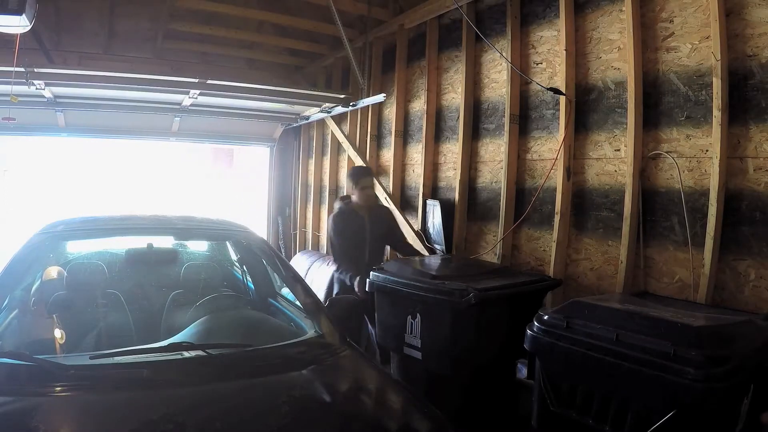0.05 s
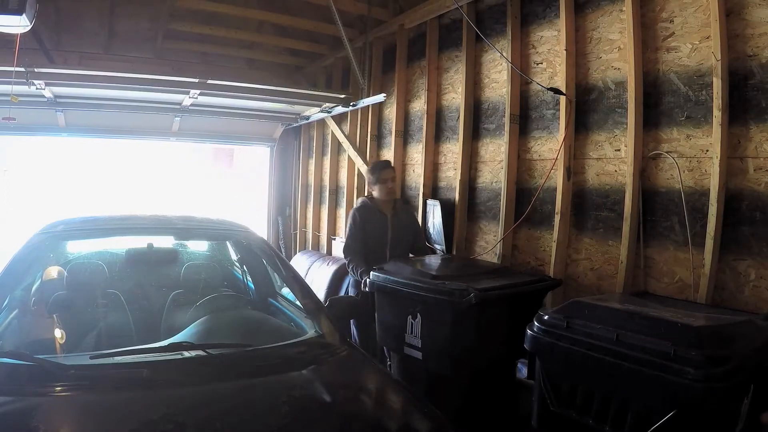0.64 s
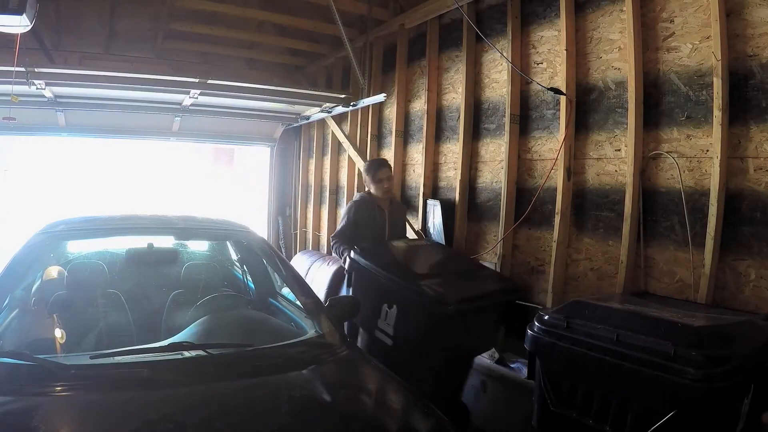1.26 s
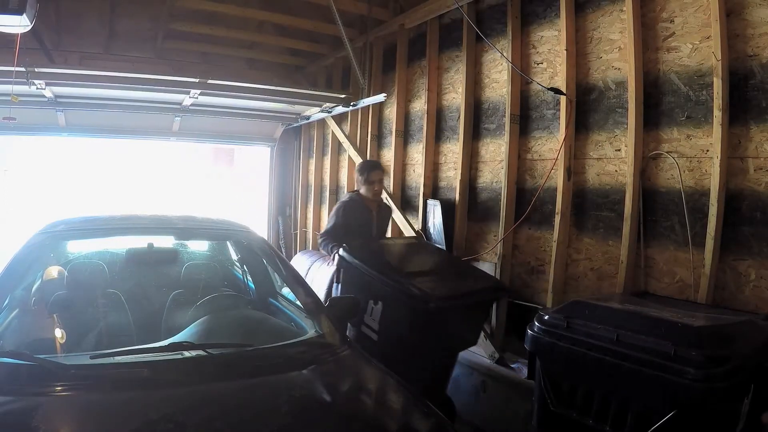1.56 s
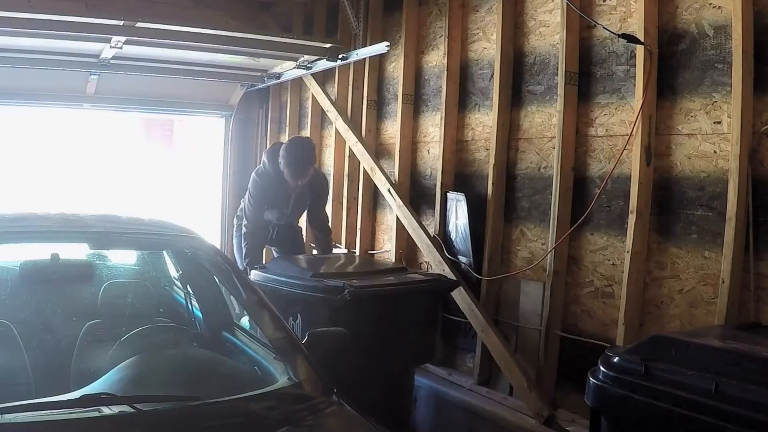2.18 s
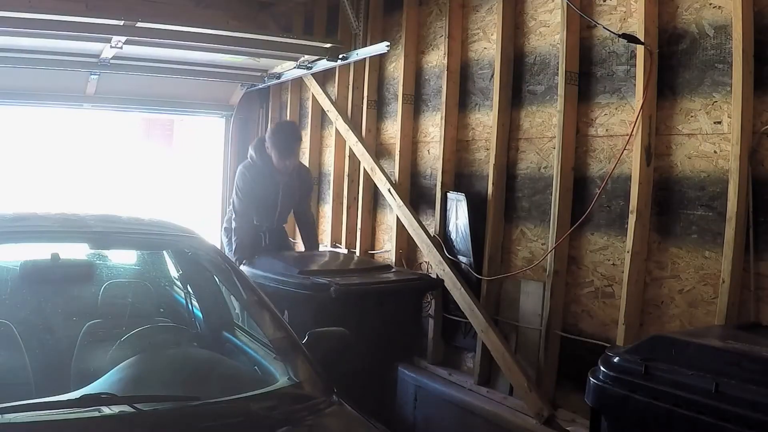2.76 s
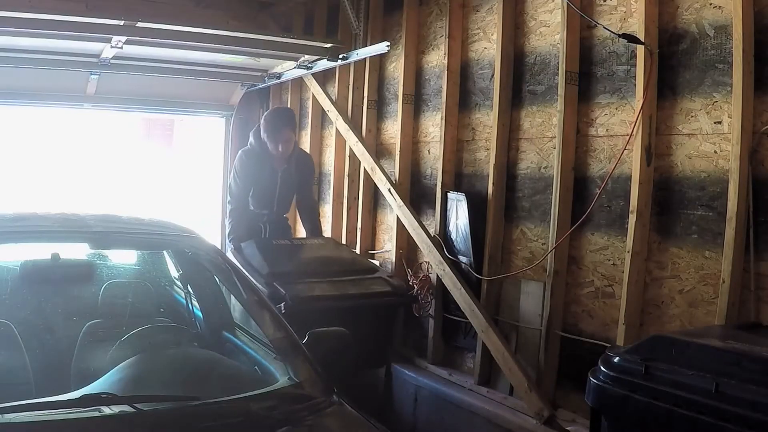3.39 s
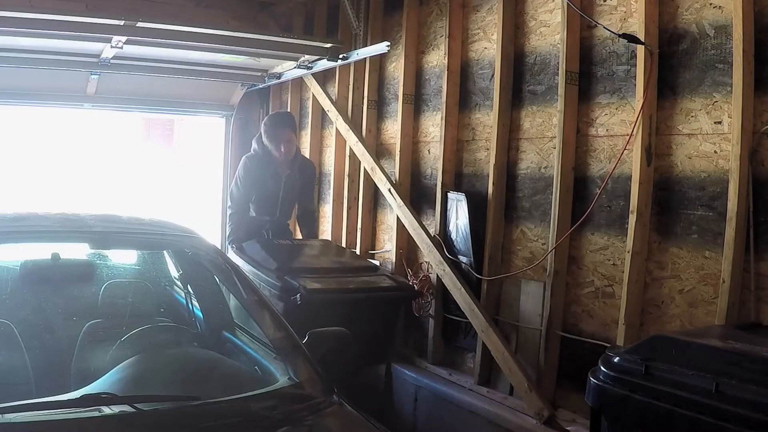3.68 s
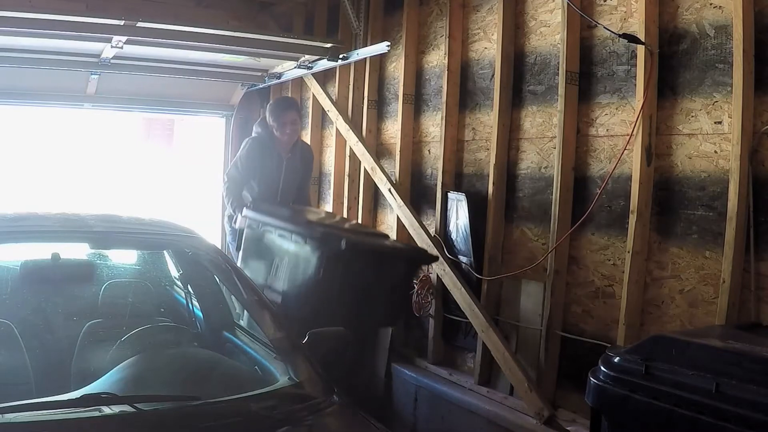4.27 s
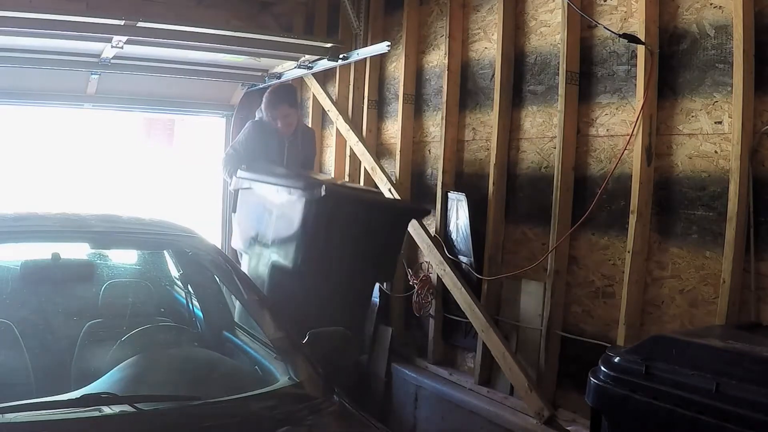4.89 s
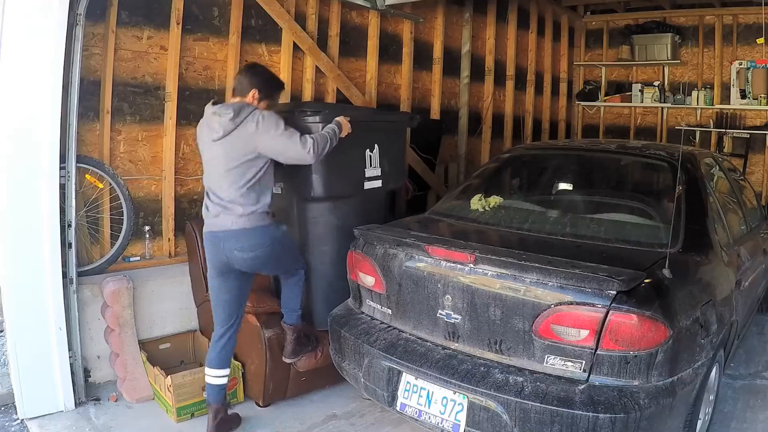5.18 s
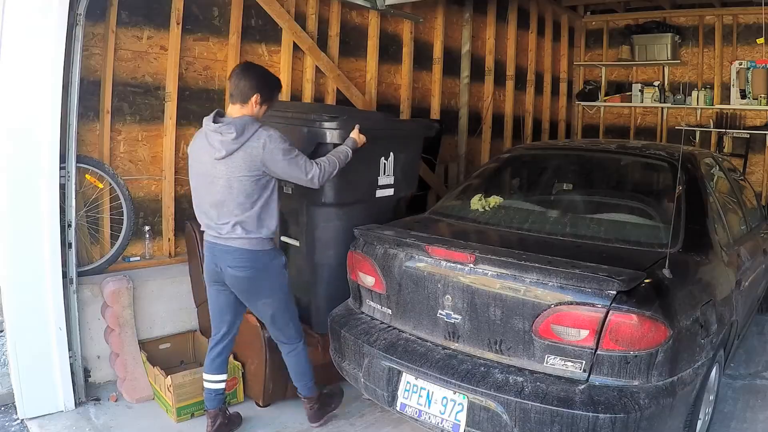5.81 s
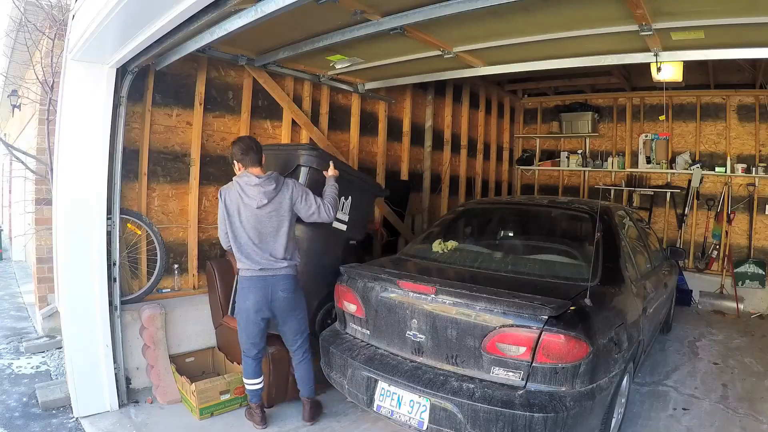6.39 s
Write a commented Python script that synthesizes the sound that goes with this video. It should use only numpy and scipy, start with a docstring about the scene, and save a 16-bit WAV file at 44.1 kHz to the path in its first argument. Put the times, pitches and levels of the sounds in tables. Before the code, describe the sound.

Hollow plastic bumps, low booms and gritty scrapes as a big wheeled bin is tipped and shoved along in a garage.

```python
"""A large plastic wheeled bin, grabbed, tipped, dragged and lifted along a timber-framed garage wall.
From inside, the microphone hears the hollow shell knock, the broad walls boom, and wheels and rim
scrape over gritty concrete; one hard clack rings out. For the last stretch the microphone is at the
open door: a few light taps sound and the bin slides on. The garage answers with a short
echo, and a faint hush and rumble come in from outdoors."""
import sys
import numpy as np
from scipy import signal
from scipy.fft import rfft, irfft
from scipy.io import wavfile
from scipy.ndimage import uniform_filter1d

SR = 44100
rng = np.random.default_rng(int(sys.argv[2]) if len(sys.argv) > 2 else 0)


def waveform_to_disk(signal):
    """Save audio, clipped to [-1, 1], as 16-bit WAV at the path in sys.argv[1]."""
    frames = np.transpose(np.atleast_2d(signal))
    scaled = np.clip(frames, -1, 1) * 32767
    samples = np.round(scaled).astype(np.int16)
    wavfile.write(sys.argv[1], SR, samples)


N = 284445
TIME = np.arange(N) / SR
DOORWAY_S = 4.96  # the microphone is at the open door from here on
USUAL_STROKE_DB = -40  # shell and shudder grow with a stroke's drive above this

# pushes and pulls of the bin: start_s, swell_s, fade_s, drive_db, grit_db (relative to the drive)
BIN_STROKES = [ (0.086, 0.0097, 0.16, -46, -10), (0.125, 0.03, 0.14, -41, -6.5),
               (0.365, 0.03, 0.097, -49.5, -6.5), (0.553, 0.011, 0.57, -53, -1), (0.64, 0.15, .1, -49.5, 1),
               (0.77, .025, 0.15, -29, -3), (0.82, 0.039, 0.68, -37, -5), (1.019, 0.017, 0.18, -31.5, -19),
               (1.119, 0.048, 0.32, -34.5, 0.5), (1.483, 0.032, 0.085, -47, 7),
               (1.625, 0.0036, 0.15, -50, 1.5), (1.925, .035, 0.074, -53, -22),
               (2.085, 0.048, .13, -47.5, -2.5), (2.225, 0.083, 0.13, -41, -3),
               (2.361, .008, 0.2, -42, -1.5), (2.54, 0.0061, 0.094, -43.5, -11),
               (2.72, 0.029, 0.35, -60.5, 2.5), (2.85, .03, 0.091, -40, -6.5),
               (2.918, 0.086, 0.12, -25.5, -11), (3.21, 0.012, 0.14, -29, -12.5),
               (3.38, 0.14, 0.062, -52.5, 0), (3.812, 0.024, 0.28, -46.5, -2),
               (3.95, 0.081, 0.3, -56, -1.5), (4.12, 0.14, 0.61, -59.5, -0.5),
               (4.898, 0.049, 0.14, -55.5, 1), (5.235, 0.071, 0.1, -48, 0.5), (5.431, .004, .1, -44.5, -28),
               (5.473, 0.025, 0.2, -39, -0.5), (5.58, 0.057, 0.25, -44, -30),
               (5.839, 0.0077, 0.26, -47.5, -8), (5.955, 0.033, 0.26, -44.5, -2),
               (5.99, 0.18, .16, -40, -1.5), (6.18, 0.076, 0.23, -43.5, 1)]
# blows on the hollow shell: start_s, force_db, pitch_hz (favoured by the spot struck)
SHELL_KNOCKS = [ (0.135, -35, 490), (0.164, -38.5, 180), (0.672, -35.5, 420), (0.81, -23.5, 473),
                (0.867, -24, 292), (0.968, -26, 300), (1.041, -19.5, 595), (1.062, -25, 358),
                (1.185, -29.5, 257), (1.345, -36, 298), (2.124, -35, 265), (2.176, -44, 260),
                (2.325, -40.5, 242), (2.575, -44, 315), (2.73, -43.5, 480), (2.866, -30.5, 434),
                (2.922, -29.5, 590), (2.963, -22, 203), (3.029, -26.5, 654), (3.227, -20, 483),
                (3.25, -25.5, 253), (3.835, -39, 172), (5.26, -41.5, 205), (5.431, -42, 550),
                (5.531, -32, 630), (5.649, -30.5, 154), (5.698, -30.5, 430), (5.855, -41, 700)]
# flexing wall panels: start_s, level_db, pitch_hz, t60_s
WALL_BOOMS = [ (0.159, -24.5, 67.4, 0.19), (0.708, -24, 52.4, 0.96), (0.786, -17.5, 96, 0.51),
              (0.88, -10.5, 45.6, .3), (0.957, -5, 44.6, 0.6), (1.038, -3, 59.9, 0.18),
              (1.131, -8, 66.6, 0.27), (1.322, -9.5, 43.7, 0.29), (2.261, -11.5, 58.7, .17),
              (2.818, -25.5, 58.5, 0.5), (2.959, -8, 111.7, 0.13), (2.993, -21, 69, 0.16),
              (3.232, -8, 47, 0.12), (3.831, -21.5, 71.7, 0.16), (5.472, -8, 67.7, 0.044),
              (5.644, -14, 70.2, 0.21), (5.713, -19, 97.6, .31), (6.226, -28.5, 75.7, 0.16)]
# ticks of wheels, lid and grit: start_s, level_db, lowest_hz, ping_db (relative to the level)
HARD_TICKS = [ (0.09, -65, 650, -18), (0.555, -59.5, 1500, -14), (0.781, -36, 2000, -15),
              (1.051, -43.5, 3500, -7), (1.102, -39, 3950, -0.5), (1.351, -47, 3160, -11),
              (1.514, -52, 1780, -14), (1.628, -49, 1500, -22), (2.118, -52, 3630, -7),
              (2.303, -43.5, 5200, -5), (2.363, -38.5, 1840, -12), (2.547, -50, 2540, -12),
              (2.86, -56, 3500, -8), (3.207, -39, 2370, -9.5), (3.432, -51, 4000, -10),
              (3.826, -59, 3970, -11), (5.48, -51, 3500, -14), (6.145, -47.5, 1800, -18)]
# hard parts meeting and rebounding: start_s, level_db
HARD_CLACKS = [(1.101, -45.5), (1.2218, -21), (1.234, -31)]
# light taps: start_s, level_db, brightness_hz, decay_s
LIGHT_TAPS = [(5.1072, -51, 3300, 0.0022), (5.156, -52, 2810, 0.003), (5.208, -43, 900, 0.0053)]

# ringing modes: pitch_hz, relative_db, t60_s
SHELL_RING = [(143, 0, 0.17), (173.9, -0.5, 0.51), (220.3, -7, 0.17), (296.4, 1, 0.42), (345, -9.5, 0.41),
              (359, -15, 0.23), (412.4, -3.5, 0.29), (480, -1.5, 0.43), (676, -15.5, 0.4),
              (723, -1.5, 0.16), (978, -19, .5), (1183, -8, .5)]  # the hollow shell
CLACK_RING = [(2906, -6, .35), (3278, -1, .48), (3365, -2, .45), (3417, -3, .4), (3941, -5, .42),
              (4250, 1, .4), (4863, -1, .36), (2196, -6, .28), (2369, -9, .4), (4084, -2, .33),
              (4127, -1, .33), (4176, -2, .33), (5128, -3, .35), (5340, -5, .3), (5658, -1, .3),
              (5927, -2, .2), (7569, -8, .25)]  # the hard parts
TICK_RING = [(4670, -6, 0.12), (4970, -3, 0.12), (5340, -3.5, .12), (6650, -4, .08), (8000, -9, 0.063)]  # lid and wheels

# spectra: frequency_hz, relative_db
SHELL_INSIDE_SPECTRUM = [(40, -52), (100, 6), (170, -6.5), (240, -3.5), (330, -0.5), (480, -3),
                         (800, -11.5), (1500, -14.5), (4000, -61.5)]  # the shell's thud from inside the garage
SHELL_DOORWAY_SPECTRUM = [(40, -19), (100, -10), (150, 5), (220, 1), (300, 0), (420, -1), (600, -9),
                          (850, -7.5), (1500, -30), (2700, -17.5), (5000, -56)]  # the same thud from the door
RASP_SPECTRUM = [(200, -29.5), (500, 4), (900, 3.5), (1400, 0.5), (2400, -9.5), (4000, -19.5),
                 (9000, -54.5)]  # plastic rubbing on concrete
GRIT_SPECTRUM = [(800, -13.5), (2000, 7.5), (3300, 6), (5500, 0.5), (8000, -5), (11000, -11.5),
                 (15000, -18.5)]  # grit crushed under the bin
CLACK_SPECTRUM = [(700, -26), (1700, -12.5), (2300, -1.5), (3000, 0), (4100, 4), (5500, -1), (8000, -6),
                  (11000, -12.5), (15000, -27.5)]  # the crack of hard parts
TICK_SPECTRUM = [(600, -22.5), (2000, 14.5), (3300, 8), (5500, 4), (8000, 1.5), (11000, -6.5), (15000, -16)]  # small hard contacts
RUMBLE_SPECTRUM = [(12, -21.5), (24, 7), (33, -6), (48, 1), (65, -2), (100, -7.5), (150, -19), (300, -68.5)]  # the bin's shudder and the outdoor rumble
HUSH_SPECTRUM = [(35, -22.5), (60, -12), (150, -17), (219, -16.5), (295, -15), (438, -22.5), (780, -20.5),
                 (1450, -24), (2110, -30.5), (3340, -29.5), (7680, -39), (15000, -47.5)]  # open air

# decay of the garage echo: frequency_hz, t60_s
ECHO_DECAY = [(80, 0.97), (300, 0.81), (1000, 0.7), (3000, 0.49), (7000, 0.42), (14000, 0.27)]
# outdoor hush, rising again at the open door: time_s, level_db
HUSH_LEVEL = [(0, -55), (0.5, -57.5), (1.6, -57.5), (2.0, -59.5), (2.5, -59.5), (3.7, -59.5), (4.2, -57),
              (4.9, -57.5), (5.1, -55.5), (6.45, -55.5)]


def bin_strokes():
    """Each push or pull swells and fades: the drive in dB of the rubbing and of the grit under it."""
    rub, grit = np.zeros((2, N)) + 1e-12
    for start_s, swell_s, fade_s, drive_db, grit_db in BIN_STROKES:
        power = np.interp(TIME[:2 * SR], [0, swell_s, swell_s + fade_s], [0, 1, 0]) ** 2.1
        add(rub, start_s, power * amp(drive_db) ** 2)
        add(grit, start_s, power * amp(drive_db + grit_db) ** 2)
    return 10 * np.log10(rub), 10 * np.log10(grit)


def bin_scrape(rub_db, grit_db):
    """Dragging rasps the plastic and crushes grit; the harder the bin presses, the more its shell joins."""
    shell_drive = amp(-37 + 1.11 * (rub_db - USUAL_STROKE_DB))
    shaking = stick_slip(per_s=900, scatter_db=2.4, judder_db=1.5, judder_hz=45)
    body = bin_shell(shell_drive * shaking, direct_db=2, ring_db=-12.5)
    rubbing = stick_slip(per_s=1500, scatter_db=1.66, judder_db=1.93, judder_hz=60)
    rasp = amp(rub_db + 0.46) * through(rubbing, response(RASP_SPECTRUM))
    crushing = stick_slip(per_s=6000, scatter_db=1.5, judder_db=2.6, judder_hz=70)
    crunch = amp(grit_db - 2.0) * through(crushing, response(GRIT_SPECTRUM))
    return body + garage(rasp + crunch, direct_db=4)


def bin_knocks(spot_q=1.4, cutoff_ratio=1.5, coupling_db=-15.5):
    """Each spot struck drives the shell near its own pitch; the yielding plastic mutes what lies above."""
    force = np.zeros(N)
    for start_s, force_db, pitch_hz in SHELL_KNOCKS:
        contact = chatter(decay_s=0.006, bite=0.48)
        push = signal.lfilter(*signal.iirpeak(pitch_hz, spot_q, SR), contact)
        add(force, start_s, blow(cut(push, cutoff_ratio * pitch_hz, "low"), force_db))
    return bin_shell(force, direct_db=-1.5, ring_db=-4.5) * amp(coupling_db)


def bin_shell(force, direct_db, ring_db):
    """The hollow shell gives a broad thud, plus a few lasting modes that do not carry to the door."""
    at_door = TIME >= DOORWAY_S
    thud = through(force * ~at_door, response(SHELL_INSIDE_SPECTRUM))
    thud += through(force * at_door, response(SHELL_DOORWAY_SPECTRUM))
    return garage(thud, direct_db) + amp(ring_db) * through(force * ~at_door, ring(SHELL_RING))


def bin_booms(push_s=0.006, overtone_ratio=3.1, overtone_db=-20.5):
    """A wall panel is pushed in over a few milliseconds and swings back slowly, with a weaker overtone."""
    out, t = np.zeros(N), TIME[:SR]
    for start_s, level_db, pitch_hz, t60_s in WALL_BOOMS:
        swing = (1 - np.exp(-(t / push_s) ** 2)) * amp(-60 * t / t60_s)
        phase = 2 * np.pi * pitch_hz * t
        tone = np.sin(phase) + amp(overtone_db) * np.sin(overtone_ratio * phase)
        add(out, start_s, amp(level_db) * swing * tone)
    return out


def bin_clack(ring_db=-4.5):
    """Hard parts meet in a sharp crack and rebound, and a cluster of bright modes rings on."""
    cracks, ringing = np.zeros((2, N))
    for start_s, level_db in HARD_CLACKS:
        crack = through(chatter(decay_s=0.0028, bite=0.18), response(CLACK_SPECTRUM))
        add(cracks, start_s, blow(crack, level_db))
        add(ringing, start_s, blow(ring(CLACK_RING), level_db + ring_db))
    return garage(cracks, direct_db=1) + ringing


def bin_ticks():
    """Small bright contacts of wheels, lid and grit, each with a brief plastic ping."""
    out, colour = np.zeros(N), response(TICK_SPECTRUM)
    for start_s, level_db, lowest_hz, ping_db in HARD_TICKS:
        contact = cut(chatter(decay_s=0.0075, bite=0.39), lowest_hz, "high")
        add(out, start_s, blow(through(contact, colour), level_db))
        add(out, start_s, blow(ring(TICK_RING), level_db + ping_db))
    return out


def light_taps():
    """Brief, light contacts, each a band of chatter with no ringing modes."""
    out = np.zeros(N)
    for start_s, level_db, brightness_hz, decay_s in LIGHT_TAPS:
        contact = cut(chatter(decay_s), 0.31 * brightness_hz, "high")
        add(out, start_s, blow(cut(contact, 1.03 * brightness_hz, "low"), level_db))
    return out


def rumble(rub_db, lag_s=0.043, steadiness=0.55):
    """A deep shudder trails each stroke, over an outdoor rumble that is louder at the door."""
    drive = amp(-33 + 1.1 * (rub_db - USUAL_STROKE_DB))
    pole = np.exp(-1 / (lag_s * SR))
    shudder = signal.lfilter([1 - pole], [1, -pole], drive)
    outdoors = amp(np.where(TIME < DOORWAY_S, -48.5, -41.5))
    noise = through(rng.standard_normal(N), response(RUMBLE_SPECTRUM))
    envelope = uniform_filter1d(np.abs(signal.hilbert(noise)), SR // 25)
    return unit(noise / envelope ** steadiness) * np.sqrt(N) * (shudder + outdoors)


def garage(x, direct_db, build_s=0.0021):
    """Direct sound, direct_db above a dense echo off studs, roof and car; the treble dies first."""
    t, hz = TIME[:SR], np.fft.rfftfreq(SR, 1 / SR)
    noise, tail = rfft(rng.standard_normal(SR)), 0
    centres_hz = [f for f, _ in ECHO_DECAY]
    for share, (_, t60_s) in zip(np.eye(len(centres_hz)), ECHO_DECAY):
        band = irfft(noise * lookup(list(zip(centres_hz, share)), hz), SR)
        tail = tail + band * amp(-60 * t / t60_s)
    echo = rfft(tail * (1 - np.exp(-t / build_s)))
    # smooth the random echo's spectrum so that it colours the sound evenly
    echo /= np.sqrt(uniform_filter1d(np.abs(echo) ** 2, size=50))
    room = unit(irfft(echo, SR)[:SR * 4 // 5])
    room[0] += amp(direct_db)
    return through(x, unit(room))


def outdoor_hush():
    """Faint open air, reaching the microphone through the door."""
    level_db = np.interp(TIME, *np.transpose(HUSH_LEVEL))
    return through(rng.standard_normal(N), response(HUSH_SPECTRUM)) * amp(level_db)


def stick_slip(per_s, scatter_db, judder_db, judder_hz):
    """Friction: dense clicks of uneven size that come in bunches; rms 1."""
    size = amp(scatter_db * np.minimum(rng.exponential(size=N), 4))
    clicks = (rng.random(N) < per_s / SR) * rng.choice([-1, 1], N) * size
    hold = int(SR / judder_hz)
    judder = uniform_filter1d(np.repeat(rng.standard_normal(N // hold + 1), hold), hold)[:N]
    return unit(clicks * amp(judder_db * judder / judder.std())) * np.sqrt(N)


def chatter(decay_s, bite=0.43):
    """A contact: a burst of tiny impacts that rises over bite * decay_s and dies quickly."""
    t = TIME[:8192]
    burst = rng.standard_normal(len(t)) * np.exp(-t / decay_s)
    window = (1 - np.exp(-t / (bite * decay_s))) * np.exp(-(t / decay_s / 4) ** 2)
    for _ in range(3):  # flatten the spectrum, so all pitches are excited about equally
        burst = irfft(np.exp(1j * np.angle(rfft(burst)))) * window
    return burst


def ring(modes):
    """Unit-energy ring of decaying modes in random phase."""
    t = TIME[:SR // 2]
    return unit(sum(amp(db - 60 * t / t60_s) * np.sin(2 * np.pi * (hz * t + rng.random()))
                    for hz, db, t60_s in modes))


def blow(x, level_db):
    """Give a blow the energy of 50 ms at the stated level."""
    return unit(x) * amp(level_db) * np.sqrt(SR / 20)


def response(spectrum, size=8192):
    """Causal unit-energy impulse response of a spectrum, by the folded cepstrum."""
    gain = amp(lookup(spectrum, np.fft.rfftfreq(size, 1 / SR)))
    cepstrum = irfft(np.log(gain))
    cepstrum[1:size // 2] *= 2
    cepstrum[size // 2 + 1:] = 0
    return unit(irfft(np.exp(rfft(cepstrum))))


def lookup(points, hz):
    """Read (frequency_hz, value) points on a log-frequency axis."""
    points_hz, values = np.transpose(points)
    return np.interp(np.log(np.maximum(hz, 1)), np.log(points_hz), values)


def through(x, impulse_response):
    """Convolve, keeping the sound's length."""
    return signal.oaconvolve(x, impulse_response)[:len(x)]


def cut(x, hz, kind, order=2):
    """Low-pass or high-pass."""
    return signal.sosfilt(signal.butter(order, hz, kind, fs=SR, output="sos"), x)


def add(out, start_s, x):
    """Mix a sound in at start_s."""
    i = int(start_s * SR)
    out[i:i + len(x)] += x[:N - i]


def amp(db):
    """Decibels to gain."""
    return 10 ** (np.asarray(db) / 20)


def unit(x):
    """Scale to unit energy."""
    return x / np.sqrt(np.sum(x ** 2) + 1e-18)


def scene():
    """The bin in mono: scraping and taps sound clearer; knocks, ticks and booms carry more echo."""
    rub_db, grit_db = bin_strokes()
    contacts = garage(bin_ticks(), direct_db=-1) + garage(light_taps(), direct_db=3) + bin_clack()
    body = bin_scrape(rub_db, grit_db) + bin_knocks() + garage(bin_booms(), direct_db=-0.5)
    return (body + contacts + rumble(rub_db) + outdoor_hush())[None]


def record(dry, bass_cut_hz=26, top_hz=15400):
    """The microphone chain drops the deepest bass, rounds the highest peaks and cuts the top."""
    rounded = np.tanh(cut(dry, bass_cut_hz, "high", order=4))
    return signal.sosfilt(signal.ellip(10, 0.2, 80, top_hz, fs=SR, output="sos"), rounded)


dry = scene()
out = record(dry)
waveform_to_disk(out)
```